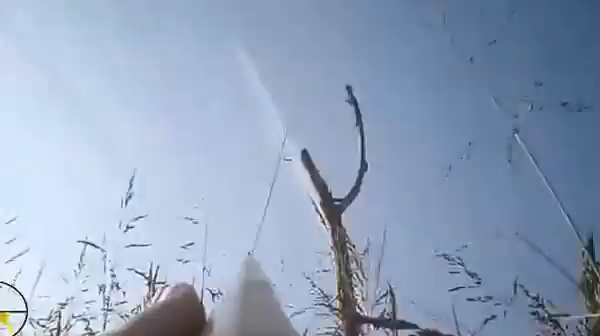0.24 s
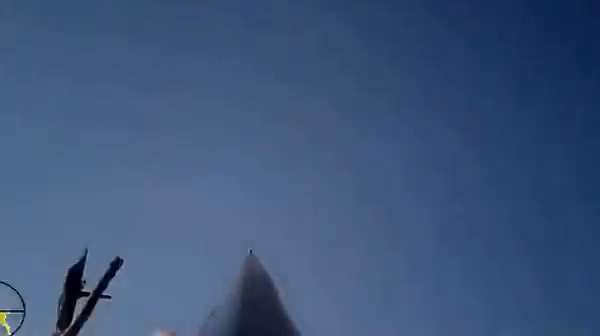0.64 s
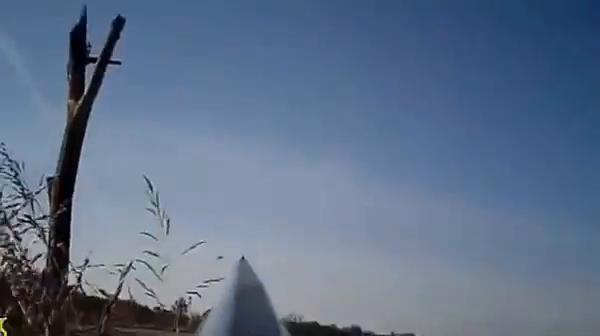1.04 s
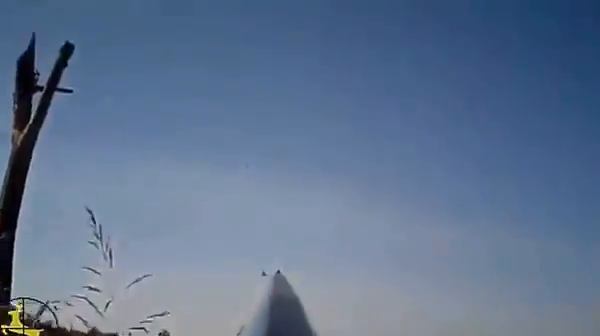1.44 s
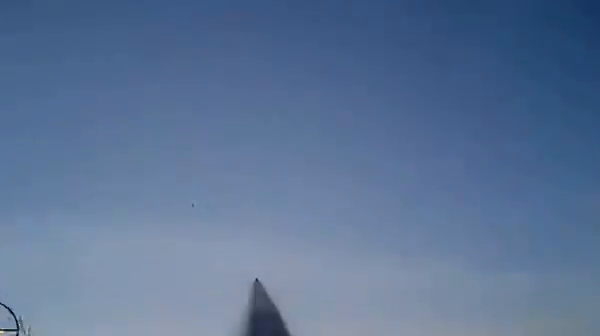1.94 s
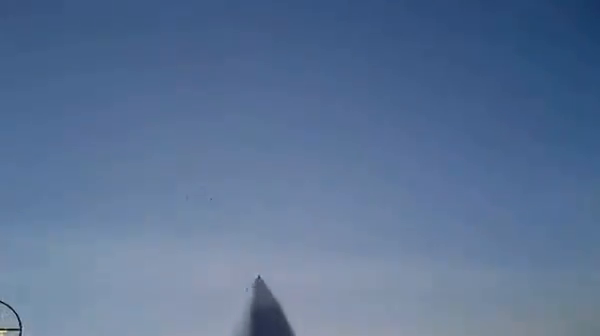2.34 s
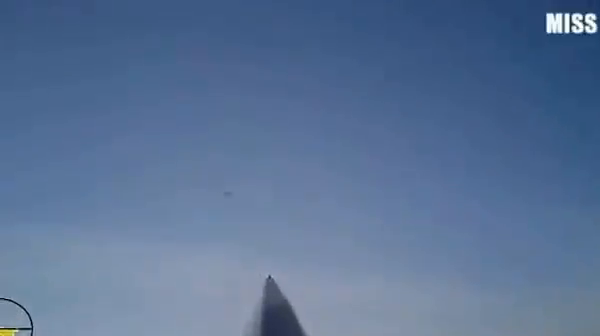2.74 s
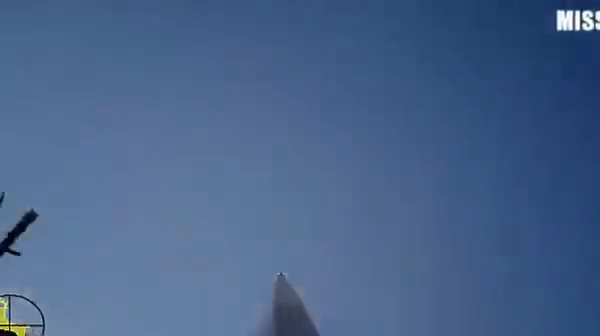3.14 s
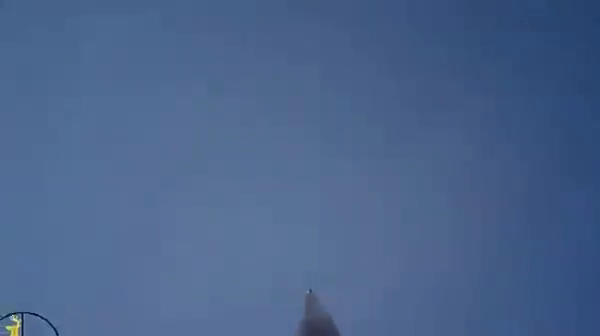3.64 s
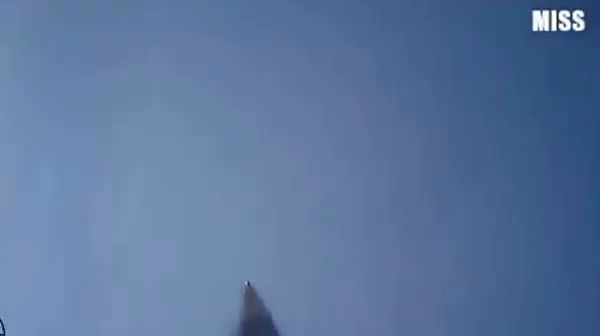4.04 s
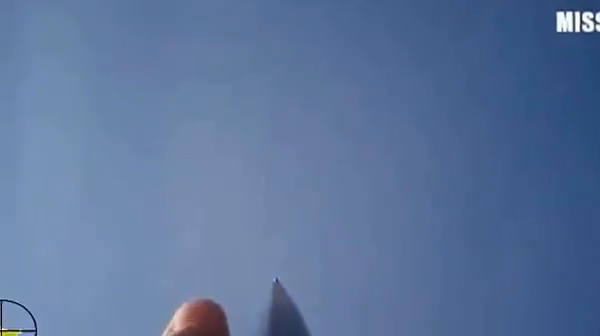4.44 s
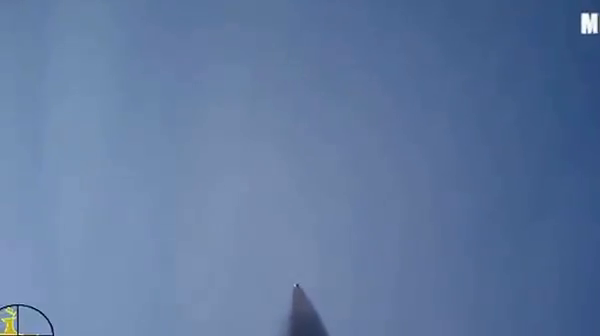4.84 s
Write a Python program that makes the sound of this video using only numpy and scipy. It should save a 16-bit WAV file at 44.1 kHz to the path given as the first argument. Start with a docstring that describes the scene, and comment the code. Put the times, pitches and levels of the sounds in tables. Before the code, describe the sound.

Light knocks on a shotgun and a swish of dry grass lead into three loud blasts, a little under a second apart. Each overloads the microphone on the barrel and rolls away over an open field. Between and just after the shots, the slide scrapes and the action clacks, steel on steel. Then come a few handling knocks, one of them sharp, with soft rustling of grass and clothing over a faint breeze.

```python
"""Three shotgun blasts in a field

A small camera clamped to the barrel hears three shots, which overload it. Each is a turbulent burst on
a swing of pressure; the frame shudders and the report rolls away over the field. Between shots the
slide scrapes back and forward and the action clacks, steel on steel. Light knocks ring the camera
mount and the barrel, and dry grass and clothing rustle over a faint breeze."""
import sys
import numpy as np
from scipy import signal
from scipy.fft import rfft, irfft, next_fast_len
from scipy.io import wavfile
from scipy.ndimage import map_coordinates

SR = 44100
rng = np.random.default_rng(int(sys.argv[2]) if len(sys.argv) > 2 else 0)


def store_wav(level_fs):
    """Save 16-bit WAV to argv[1]."""
    pcm = np.round(np.clip(np.atleast_2d(level_fs), -1, 1) * 32767)
    wavfile.write(sys.argv[1], SR, pcm.T.astype(np.int16))


N = 225389
TIME = np.arange(N) / SR

# Noise colours. Each row: frequency in Hz, spectral level in dB.
BREEZE_COLOUR = [(25, -0.5), (90, 0.5), (300, 0.5), (450, -2), (750, -9), (1500, -8), (2500, -18.5),
                 (5000, -18), (9000, -22), (15000, -20)]
GRASS_COLOUR = [(120, -48), (200, -26), (272, -15), (357, 0.5), (696, -1), (818, -6.5), (1660, 0.5),
                (3410, -8.5), (5970, -9), (8570, -23.5), (15000, -14.5)]
STEEL_COLOUR = [(40, -39), (250, -1), (700, 0.5), (1300, 1.5), (1900, 1), (2500, -0.5), (3300, -11.5),
                (4300, -0.5), (5000, -11), (6000, -2), (7500, -16.5), (10000, -20), (13000, -14.5),
                (15000, -20)]
MUZZLE_COLOUR = [(40, 10), (200, 0.5), (500, 2.5), (1200, 4.5), (2200, 2.5), (3200, -2.5), (4400, 0.5),
                 (6000, -5), (9000, -13), (15000, -10)]
ECHO_COLOUR = [(40, -17), (150, -15.5), (350, -7.5), (700, -0.5), (1200, -1), (2000, -1), (2600, -3),
               (3300, -10), (4200, -3), (5000, -8.5), (6200, -3.5), (8500, -15), (14000, -3.5)]
TICK_COLOUR = [(4200, -59), (5000, 0.5), (6000, -6.5), (8000, 9), (15000, -10)]

# The gun swings through grass and past clothing.
# Each row: fastest moment in seconds, level in dB, half length in seconds.
GUN_SWINGS = [(0.57, -44, 0.2), (3.221, -51, 0.095), (3.49, -45.5, 0.09), (4.554, -51, 0.075),
              (5.03, -57, 0.056)]
# The background dips briefly after each racking. Each row: centre in seconds, depth in dB.
BACKGROUND_DIPS = [(1.56, 1.5), (2.1, 4), (3.095, 8), (4.37, 4)]
# Knocks on the gun.
# Each row: start in seconds, level in dB, hardness in dB per octave, place along the barrel from 0 to 1.
GUN_KNOCKS = [(0.1214, 5, 1.5, 0.29), (0.3493, -1.5, 5, 0.03), (0.438, -9.5, 9, 0), (0.553, -13.5, -7, 0.3),
              (0.643, -14, 3, 0.2), (0.687, -16, -22, 0), (3.4474, -4, -12, 0.03), (3.469, -12.5, -11, 0.2),
              (3.572, -20.5, -26, 0.15), (3.981, 8, 5.5, 0.49), (4.411, -19.5, -14, 0),
              (4.483, -13.5, 3, 0), (4.6011, -14.5, -1.5, 0.2)]
# Steel contacts in the action. Each row: start in seconds, level in dB, brightness in dB per octave,
# resonance of the struck part in Hz, lead of a first touch in seconds (0 for a clean hit).
ACTION_CLACKS = [(0.7436, -13, -5, 1210, 0), (1.2539, -14, 21, 13000, 0), (1.2573, -14, 2, 1370, 0.0055),
                 (1.287, -24, -1, 1420, 0.0053), (1.4213, -24.5, 1, 1690, 0),
                 (1.472, -18.5, 1.5, 1750, 0.0054), (1.687, -12, -3, 1590, 0.0028),
                 (1.72, -15, 3.5, 2153, 0.011), (1.736, -9, 2.5, 2330, 0.045),
                 (2.012, -18, 1.5, 4250, 0.0028), (2.0294, -0.5, 1, 2060, 0.0052),
                 (2.0486, -19, 1, 1970, 0.002), (2.0645, 8.5, 1, 1726, 0.0022),
                 (2.2699, -14.5, -0.5, 1900, 0.0014), (2.2958, 11.5, 2.5, 12690, 0.0092),
                 (2.826, -13, 0, 1850, 0.0017), (2.8341, 0.5, 1, 1740, 0.0014),
                 (2.861, -6.5, 3, 2330, 0.0083), (2.8893, -4.5, 2, 2290, 0.007),
                 (2.9231, -12.5, 3.5, 2410, 0), (2.9719, -16, 0.5, 2310, 0.0035),
                 (3.004, 0.5, 1.5, 2230, 0.0077), (3.0317, 2, 4, 2170, 0), (3.0451, -0.5, 6, 2140, 0),
                 (4.2397, -21, 1, 740, 0.0052), (4.269, -27, 2.5, 885, 0.0027)]
# The shots. Each row: start in seconds, blast level in dB, hold in seconds, resonance in Hz, recoil
# in dB, pressure in dB, seconds until the push turns to suction, rolling report in dB.
GUNSHOTS = [(0.7147, 4, 0.0037, 1700, 0.5, -3, 0.0067, -23),
            (1.6277, 19.5, 0.0068, 6043, -12, 3.5, 0.009, -21),
            (2.402, 8.5, 0.0031, 1237, 2.5, 4, 0.00672, -22)]
# The gun jolts roughly against the camera around a shot.
# Each row: start in seconds, level in dB, hold in seconds, T60 in seconds, resonance in Hz.
CAMERA_JOLTS = [(1.6421, 1, 0.0036, 0.046, 415), (1.654, -1.5, 0.0022, 0.051, 1860),
                (2.382, -1, 0.0047, 0.027, 1270), (2.4105, -1.5, 0.0014, 0.057, 1300)]
# Decay of the field's echo, before it thins out. Each row: frequency in Hz, T60 in seconds.
ECHO_DECAY = [(100, 4.8), (1000, 5.1), (2500, 3.46), (5000, 1.19), (8000, 0.86), (14000, 0.25)]
# Nearby banks and bushes answer each shot. Each row: delay in seconds, dB relative to the shot's pressure.
SLAP_ECHOES = [(0.049, -22.5), (0.067, -22.5), (0.114, -25.5)]
# Strokes of the slide. Each row: start in seconds, length in seconds, level at full speed in dB.
SLIDE_STROKES = [(1.195, 0.11, -38.5), (1.37, 0.12, -40.5), (1.984, 0.04, -34), (2.336, 0.054, -17),
                 (2.826, 0.029, -25), (2.946, 0.035, -24), (2.993, 0.055, -19), (4.223, 0.071, -47.5)]
# Thin metallic ticks. Each row: start in seconds, level in dB, brightness in dB per octave.
METAL_TICKS = [(2.7293, 4, -9.5), (3.525, -29, -2)]

# What rings when struck. Each row: frequency in Hz, level in dB, T60 in seconds.
MOUNT_MODES = [(1080, -24.5, 0.023), (1440, -4.5, 0.0077), (1927, 0, 0.0076), (2410, -17, 0.015),
               (4530, -23.5, 0.0088), (5810, -9, 0.0025)]  # the camera mount under a firm knock
BARREL_MODES = [(687, -44.5, 0.24), (1210, -53, 0.52), (1707, -28.5, 0.072), (2430, -30, 0.067)]  # the barrel bending, lowest mode first
ACTION_MODES = [(1250, -44, 0.053), (1666, 0.5, 0.031), (2330, -44, 0.055), (2686, -14, 0.092),
                (4520, -23, 0.14), (4320, -25.5, 0.03887), (5750, -8.5, 0.045), (6160, -25, 0.07),
                (12400, -29, 0.037), (14100, -11.5, .04)]  # narrow rings of the steel parts
FRAME_MODES = [(465, 4, 0.03), (159, 2.5, 0.023)]  # the frame's dull shudder under recoil


def amp(db):
    """Decibels to gain."""
    return 10 ** (np.asarray(db) / 20)


def unit(x):
    """Scale to rms 1."""
    return x / np.sqrt(np.mean(x ** 2) + 1e-20)


def along(points, hz):
    """Read (Hz, value) points along a log frequency axis."""
    knots, values = np.transpose(points)
    return np.interp(np.log(hz + 1), np.log(knots + 1), values)


def wobble(rate, size=N):
    """A smooth random curve, rate knots a second."""
    return map_coordinates(rng.standard_normal(size // 20), [np.arange(size) * rate / SR], mode="wrap")


def swell(centre, half_length):
    """A smooth hump of height 1, timed in seconds."""
    return np.exp(-((TIME - centre) / half_length) ** 2)


def attack(t, rise_s):
    """A fade-in with time constant rise_s."""
    return 1 - np.exp(-t / rise_s)


def mode(hz, db, t60, t):
    """One damped vibration."""
    return amp(db - 60 * t / t60) * np.sin(2 * np.pi * hz * t)


def noise(spectrum, size=N, tilt_db=0, peak_hz=1000, peak_db=0, octaves=0.37):
    """Coloured noise of rms 1, tilted in dB per octave above 300 Hz and lifted around one resonance."""
    hz = np.fft.rfftfreq(size, 1 / SR)
    pitch = np.log2(np.maximum(hz, 300) / peak_hz)
    colour = amp(along(spectrum, hz) + tilt_db * pitch + peak_db * np.exp(-(pitch / octaves) ** 2))
    return unit(irfft(rfft(rng.standard_normal(size)) * colour, size))


def add(track, start, sound):
    """Mix a sound into the track at start seconds."""
    part = track[round(start * SR):][:len(sound)]
    part += sound[:len(part)]


def breeze_and_grass(breeze_db=-49.5, resting_db=-56.5, grain_db=2.5, snaps_per_s=110, snap_db=-5):
    """A faint breeze; grass and clothing rustle and dry stalks snap, louder as the gun swings."""
    breeze = noise(BREEZE_COLOUR) * amp(breeze_db + 0.66 * wobble(5.6))
    rustle = unit(noise(GRASS_COLOUR) * amp(grain_db * wobble(450) + 2.4 * wobble(45)))
    breaks = (rng.random(N) < snaps_per_s / SR) * rng.exponential(size=N)
    snap_decay = amp(-60 * TIME[:SR // 50] / 0.018)
    snaps = unit(noise(GRASS_COLOUR) * signal.fftconvolve(breaks, snap_decay)[:N])
    motion = amp(resting_db) + sum(amp(db) * swell(centre, half) for centre, db, half in GUN_SWINGS)
    dip_db = sum(depth * swell(centre, half_length=0.026) for centre, depth in BACKGROUND_DIPS)
    return amp(-dip_db) * (breeze + motion * (rustle + amp(snap_db) * snaps))


def knocks(crack_db=-17, crack_t60=0.016, halving_db=8.5):
    """Each knock cracks and rings the mount; the barrel's modes sound unless struck at their nodes."""
    out, t = np.zeros(N), TIME[:SR // 3]
    for start, db, hardness, place in GUN_KNOCKS:
        sustain = 2 ** (min(db, 0) / halving_db)  # the hand damps light knocks
        mount = sum(mode(hz, level + hardness * np.log2(hz / 2000) + rng.normal(0, 1), t60 * sustain, t)
                    for hz, level, t60 in MOUNT_MODES)
        barrel = sum(np.sin(np.pi * k * place) * mode(*row, t) for k, row in enumerate(BARREL_MODES, 1))
        crack = noise(STEEL_COLOUR, len(t), tilt_db=hardness)
        crack *= amp(crack_db - 60 * t / (crack_t60 * sustain))
        add(out, start, amp(db) * (mount + barrel + crack) * attack(t, 0.00053))
    return out


def action(touch_db=-7, hammer_lead_s=0.0055, hammer_db=-24, snap_db=-6, snap_t60=0.016, choke_db=20):
    """Steel parts meet, often touching once first: a bright snap, a dense clack and a faint ring."""
    out, t = np.zeros(N), TIME[:SR // 6]
    hits = [row[:4] for row in ACTION_CLACKS]
    touches = [(start - lead, db + touch_db, brightness, hz)
               for start, db, brightness, hz, lead in ACTION_CLACKS if lead > 0]
    hammer_falls = [(start - hammer_lead_s, hammer_db, -2, 900) for start, *_ in GUNSHOTS]
    for start, db, brightness, hz in hits + touches + hammer_falls:
        snap = amp(snap_db - 60 * t / snap_t60) * noise(STEEL_COLOUR, len(t), tilt_db=brightness + 1.5)
        clack_t60 = 0.014 * 2 ** (-db / 20)  # a hit 20 dB harder dies twice as fast
        clack = noise(STEEL_COLOUR, len(t), tilt_db=brightness, peak_hz=hz, peak_db=9.5)
        clack *= amp(-60 * t / clack_t60)
        ring = sum(mode(ring_hz * rng.normal(1, 0.0061), level + rng.normal(0, 2.1), t60, t)
                   for ring_hz, level, t60 in ACTION_MODES)
        ring /= 1 + amp(db + choke_db)  # hard stops press the parts together and choke their ring
        add(out, start, amp(db) * (snap + clack + ring) * attack(t, 0.00049))
    return out


def blasts(blast_t60=0.031):
    """Each shot is a turbulent burst riding on one swing of pressure; jolts add more bursts."""
    out, t = np.zeros(N), TIME[:SR // 4]
    muzzle_bursts = [(start, db, hold, blast_t60, hz) for start, db, hold, hz, *_ in GUNSHOTS]
    for start, db, hold, t60, hz in muzzle_bursts + list(CAMERA_JOLTS):
        envelope = amp(db - 60 * np.maximum(t - hold, 0) / t60) * attack(t, 0.00026)
        add(out, start, envelope * noise(MUZZLE_COLOUR, len(t), peak_hz=hz, peak_db=6.5))
    for start, *_, pressure_db, turn_s, _ in GUNSHOTS:
        half_length_s = 0.00061 + 0.13 * turn_s
        phase = (TIME - start - turn_s) / half_length_s
        strength = np.where(phase < 0, 0.55, 1.5)  # the suction is the stronger half
        out -= amp(pressure_db) * strength * phase * np.exp(-phase ** 2 / 2)
    return out


def rolling_reports(lumpy_db=2.0, tree_line_s=0.34, thinning_db_per_s=34):
    """Ground and trees scatter each report; the treble dies first, and echoes thin past the tree line."""
    out, t = np.zeros(N), TIME[:2 * SR]
    thinning_db = -thinning_db_per_s * np.clip(t - tree_line_s, 0, 0.33)
    for start, *_, report_db in GUNSHOTS:
        hz, age, bands = signal.stft(noise(ECHO_COLOUR, len(t)), SR, nperseg=256)
        bands *= amp(-60 * age / along(ECHO_DECAY, hz)[:, None])
        roll = signal.istft(bands, SR, nperseg=256)[1][:len(t)]
        level_db = report_db + thinning_db + lumpy_db * wobble(157.5, len(t))
        add(out, start, roll * amp(level_db) * attack(t, 0.016))
    return out


def frame_thuds(recoil_lead_s=0.00434, stop_db=-23):
    """The whole frame shudders for a few cycles under each recoil and each stop of the action."""
    out, t = np.zeros(N), TIME[:SR // 8]
    for start, *_, recoil_db, _, turn_s, _ in GUNSHOTS:
        shudder = sum(mode(hz, recoil_db + level, t60, t) for hz, level, t60 in FRAME_MODES)
        add(out, start + turn_s - recoil_lead_s, shudder)
    for start, clack_db, *_ in ACTION_CLACKS:
        add(out, start, mode(hz=223, db=clack_db + stop_db, t60=0.026, t=t))
    return out


def slapbacks(tilt_db=-4.0, t60=0.039):
    """Near banks and bushes throw back dull single echoes early in the long roll."""
    out, t = np.zeros(N), TIME[:SR // 8]
    for start, *_, pressure_db, _, _ in GUNSHOTS:
        for delay, level in SLAP_ECHOES:
            envelope = amp(pressure_db + level - 60 * t / t60) * attack(t, 0.00046)
            add(out, start + delay, envelope * noise(ECHO_COLOUR, len(t), tilt_db=tilt_db))
    return out


def slide(speed_up_db=2, release_t60=0.046, chatter_db=4.0):
    """The slide scrapes and chatters along its rails, louder as it gathers speed, then dies away."""
    envelope = np.zeros(N)
    for start, length, db in SLIDE_STROKES:
        t = np.maximum(TIME - start, 0)
        build_db = speed_up_db * np.minimum(t / length - 1, 0)
        release_db = -60 * np.maximum(t - length, 0) / release_t60
        envelope += amp(db + build_db + release_db) * attack(t, 0.0047)
    scrape = noise(STEEL_COLOUR, tilt_db=0.54, peak_hz=2000, peak_db=4.5)
    return envelope * unit(scrape * amp(chatter_db * wobble(450)))


def ticks(t60=0.0042):
    """Thin, bright metallic ticks with no body."""
    out, t = np.zeros(N), TIME[:SR // 20]
    for start, db, brightness in METAL_TICKS:
        envelope = amp(db - 60 * t / t60) * attack(t, 0.00025)
        add(out, start, envelope * noise(TICK_COLOUR, len(t), tilt_db=brightness))
    return out


def scene():
    """Gunfire, gun handling and the outdoor bed, mixed at one microphone."""
    gunfire = blasts() + frame_thuds() + slapbacks() + rolling_reports()
    handling = slide() + action() + knocks() + ticks()
    return (gunfire + handling + breeze_and_grass())[None]


def record(dry, ceiling=0.59, knee=4, duck=10, lag_s=0.059, edge_hz=15000, top_hz=16478):
    """Gain control ducks after loud sounds, too slowly to stop the overload; the top end is cut off."""
    pole = np.exp(-1 / (lag_s * SR))
    load = np.minimum(dry ** 2, ceiling ** 2)
    for _ in range(2):  # two smoothing stages: the dip comes just after the blow
        load = signal.lfilter([1 - pole], [1, -pole], load)
    ducked = dry / (1 + duck * np.abs(load))
    saturated = ducked / (1 + np.abs(ducked / ceiling) ** knee) ** (1 / knee)
    size = next_fast_len(N + SR // 4)
    hz = np.fft.rfftfreq(size, 1 / SR)
    low_pass = amp(np.interp(hz, [edge_hz, top_hz], [0, -40])) * (hz < top_hz)
    return irfft(rfft(saturated, size) * low_pass, size)[..., :N]


dry = scene()
out = record(dry)
store_wav(out)
```